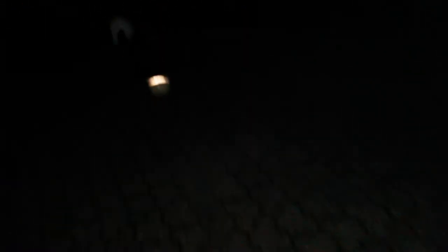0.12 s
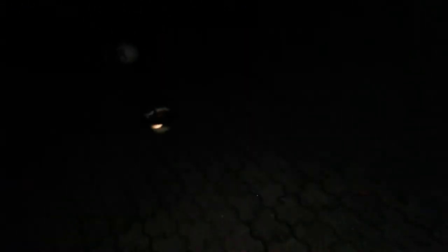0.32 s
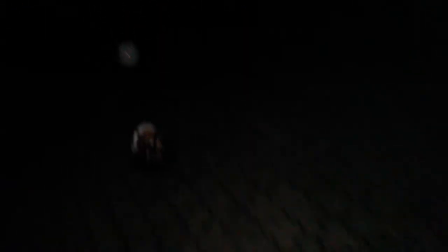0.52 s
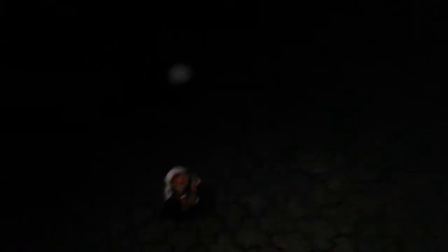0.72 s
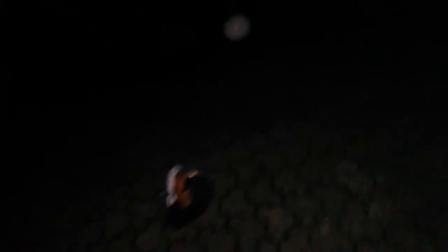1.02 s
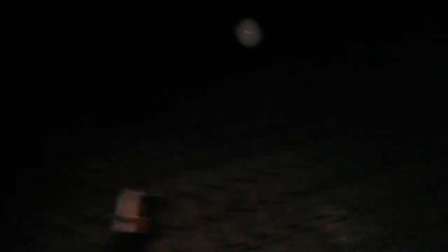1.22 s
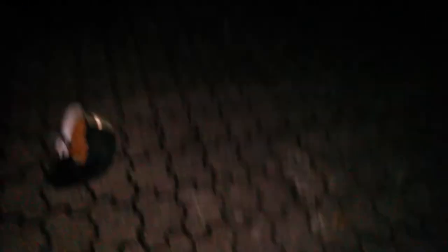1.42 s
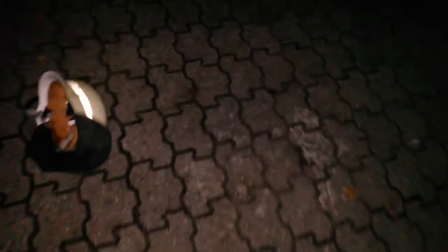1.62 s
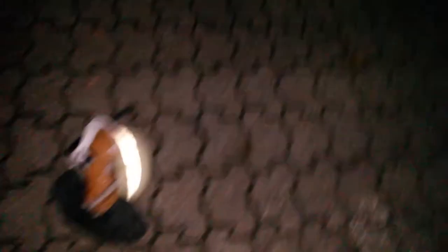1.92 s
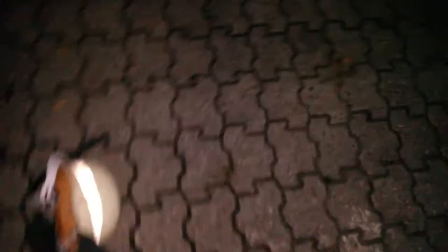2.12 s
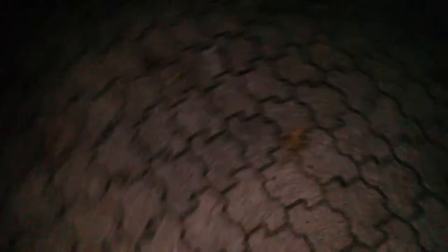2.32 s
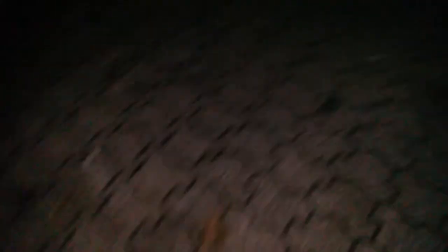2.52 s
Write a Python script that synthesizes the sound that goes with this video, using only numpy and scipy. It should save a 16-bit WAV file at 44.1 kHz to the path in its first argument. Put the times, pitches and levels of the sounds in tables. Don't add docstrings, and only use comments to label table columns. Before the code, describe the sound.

A hard helmet clatters on stone paving: light ticks from 0.1 s, a bounce at 0.24, the loudest woody crack at 0.31, a hollow landing at 0.4, then a sandy skid and short buckle rattle near 0.6. Sparser taps lead to sharp raps at 1.06 and 1.23. From 1.5 s shoes scuff grit, busiest at 2.0-2.5, with handling rumble and cloth hiss growing; walls answer faintly.

```python
import sys
import numpy as np
from scipy import signal
from scipy.fft import rfft, irfft, next_fast_len
from scipy.io import wavfile
from scipy.ndimage import uniform_filter1d, map_coordinates

SR = 44100
rng = np.random.default_rng(int(sys.argv[2]) if len(sys.argv) > 2 else 0)


def invert_db(level):
    return 10 ** (np.asarray(level, dtype=float) / 20)


def persist_wave(psi):
    counts = np.round(np.clip(psi, -1, 1) * 32767).astype(np.int16)
    wavfile.write(sys.argv[1], SR, np.atleast_2d(counts).T)


N = 116865


def unit(x):
    return x / np.sqrt(np.mean(x ** 2) + 1e-20)


def along(points, hz):
    f, v = np.transpose(points)
    return np.interp(np.log(hz + 1), np.log(f + 1), v)


def wobble(rate):
    knots = rng.standard_normal(int(N * rate / SR) + 4)
    return map_coordinates(knots, [np.arange(N) * rate / SR])


def filtered(x, response):
    m = next_fast_len(N + SR // 2)
    return irfft(rfft(x, m) * response(np.fft.rfftfreq(m, 1 / SR)), m)[..., :N]


def noise(spectrum, patchy_db=0):
    z = signal.stft(rng.standard_normal((3, N)), nperseg=256)[2]
    field = uniform_filter1d(rng.standard_normal(z.shape[1:]), size=4, axis=0)
    field = uniform_filter1d(field, size=10, axis=1)
    patchy = signal.istft(z * invert_db(patchy_db * unit(field)), nperseg=256)[1][:, :N]
    x = filtered(patchy, lambda hz: invert_db(along(spectrum, hz)))
    return x / np.std(x)


def swell(s, rise, t60, length=.12):
    t = np.arange(int(length * SR)) / SR
    return round(s * SR), (1 - np.exp(-(t / rise) ** 2)) * invert_db(-60 * t / np.clip(t60, .004, .3))


def slide(s, rise, fall):
    t = np.arange(N) / SR
    return np.exp(-np.where(t < s, ((s - t) / rise) ** 2, 2 * (t - s) / fall))


def add(track, start, piece):
    track[start:start + len(piece)] += piece[:N - start]


# start_s [s], rumble_level_db [dB], hiss_level_db [dB]
WALK = [
    (0, -67.5, -56.5),
    (.3, -64.5, -55),
    (1.15, -61.5, -59.5),
    (1.42, -59, -56),
    (1.7, -55.5, -52.5),
    (2.65, -52, -52.5),
]
# freq_hz [Hz], level_db [dB]
RUMBLE = [(90, -6), (150, -3), (280, 0.5), (400, -8), (1200, -23.5), (2500, -77)]
# freq_hz [Hz], level_db [dB]
HISS = [(300, -70), (500, 2), (3500, 0.5), (8500, -5), (11000, 6), (13000, -5.5), (15300, -7), (15700, -48)]
# freq_hz [Hz], level_db [dB]
WIND = [(20, -22.5), (65, 1), (130, -7), (300, -47)]


def walk():
    s, rumble_db, hiss_db = np.transpose(WALK)
    t = np.arange(N) / SR
    rumble_db = np.interp(t, s, rumble_db)
    hiss_db = np.interp(t, s, hiss_db)
    lumps_db = 3 * wobble(50) + wobble(6)
    ticks_db = wobble(20) + 8 * np.clip(wobble(400) - 1.3, 0, None)
    rumble = invert_db(rumble_db + 4.5 + lumps_db) * noise(RUMBLE)
    hiss = invert_db(hiss_db + 1.0 + ticks_db) * noise(HISS, patchy_db=2.0)
    wind_db = -55 + 0.7 * (rumble_db + 52.0)
    return rumble + hiss + invert_db(wind_db) * noise(WIND)


# freq_hz [Hz], t60_s [s]
YARD = [(200, 0.62), (3000, 0.45), (10000, 0.23)]


def yard(x):
    hz, t, z = signal.stft(rng.standard_normal((2, SR // 3)), SR, nperseg=256)
    decay = invert_db(-60 * t / along(YARD, hz)[:, None])
    tail = signal.istft(z * decay, SR, nperseg=256)[1]
    late = np.pad(x, (200, 0))[None]
    return signal.fftconvolve(late, tail / np.linalg.norm(tail[0]), axes=1)[:, :N]


# peak_s [s], rise_s [s], fall_s [s], level_db [dB]
SKIMS = [
    (.556, 0.0041, .02, -38),
    (.571, .003, .012, -26),
    (0.581, 0.0048, 0.023, -34),
    (1.002, 0.0065, 0.051, -37.5),
]
# freq_hz [Hz], level_db [dB]
SAND = [(6000, -40), (8500, -11), (11000, 3), (14000, -4.5), (15500, -10), (16000, -44)]


def skims():
    level = sum(invert_db(db) * slide(s, rise, fall) for s, rise, fall, db in SKIMS)
    return level * unit(invert_db(4 * wobble(700))) * noise(SAND)


# peak_s [s], rise_s [s], fall_s [s], treble_db [dB], body_db [dB]
DRAGS = [(0.243, 0.0047, 0.052, -41, -32), (0.338, 0.004, 0.14, -55, -36), (0.57, 0.024, 0.016, -52, -65),
         (0.636, 0.0036, 0.18, -44.5, -49), (0.994, 0.0021, 0.01, -38, -42.5),
         (1.238, 0.026, 0.11, -47, -47.5), (1.527, 0.0061, 0.023, -53, -39.5),
         (1.764, 0.0082, 0.17, -55, -47.5), (2.041, 0.028, 0.036, -46, -43),
         (2.184, 0.011, 0.037, -44, -30), (2.279, 0.014, 0.095, -41.5, -42.5),
         (2.64, 0.0085, 0.1, -40, -42)]
# freq_hz [Hz], level_db [dB]
STONE = [(2000, -61), (3500, -4.5), (8500, -6), (11000, 3), (13000, -25), (15300, -30), (15800, -35)]
# freq_hz [Hz], level_db [dB]
SHELL = [(150, -6.5), (400, -1), (1600, -4), (5000, -14.5)]


def grain(rate, deep_db):
    lifts = np.clip(wobble(250) - .4, 0, 1.6)
    return unit(invert_db(deep_db * lifts + 3 * wobble(rate)))


def drags():
    shapes = np.array([slide(s, rise, fall) for s, rise, fall, *_ in DRAGS])
    grit, body = invert_db(np.array(DRAGS)[:, 3:]).T @ shapes
    return grit * grain(900, 8) * noise(STONE) + body * grain(400, 4) * noise(SHELL)


# start_s [s], level_db [dB], width_s [s]
POPS = [
    (.399, -14.5, 0.00024),
    (1.0645, -4.5, 0.000052),
    (2.315, -19.5, 0.000073),
    (2.3286, -10.5, 0.00037),
]
# start_s [s], level_db [dB], width_s [s]
MORE_POPS = [(0.238, -26, 0.00018), (.247, -28, 0.00023), (.256, -33, .0002), (.289, -37, .0002),
             (1.308, -36, .0003), (1.338, -40, .00007), (2.189, -33, 0.000089), (0.391, -39, 0.00028),
             (0.575, -34, 0.00019), (.659, -36, 0.00011), (.694, -29, 0.00014), (.743, -21, 0.00017),
             (0.822, -25.5, 0.00017), (1.049, -45, 0.00025), (1.07, -18.5, 0.00038), (1.097, -30.5, 0.00061),
             (1.1786, -48, 0.000091), (1.253, -41, 0.00007), (1.432, -28, 0.00011), (1.523, -9.5, 0.00005),
             (1.641, -30, 0.0004), (1.657, -31, 0.00014), (1.775, -41, .00017), (1.791, -26, .0001),
             (1.802, -22, .0004), (1.853, -50, .00015), (1.886, -47, 0.000075), (1.999, -32, 0.0002),
             (2.045, -22, 0.00013), (2.138, -26.5, 0.00016), (2.206, -30, 0.00018), (2.422, -32, 0.00022),
             (2.47, -20.5, .00008)]


def pops():
    t = np.arange(N) / SR
    out = np.zeros(N)
    for s, db, width in POPS + MORE_POPS:
        u = np.clip(t - s, 0, None) / width
        out -= invert_db(db) * u * (2 - u) * np.exp(-u)
    return out


def struck(rows, partials, rise, gain_db):
    out, chance = np.zeros(N), rng.standard_normal((len(rows), 8))
    scatter_db = 2 * chance[:, :4]
    detune = 1 + .04 * chance[:, 4:] * (np.arange(4) > 0)
    for (s, db, hz, t60), level_db, off in zip(rows, scatter_db, detune):
        start, shape = swell(s, rise, t60)
        t = np.arange(len(shape)) / SR
        tone = sum(invert_db(level + level_db[k]) * np.sin(2 * np.pi * hz * ratio * off[k] * t)
                   for k, (ratio, level) in enumerate(partials))
        add(out, start, invert_db(db + gain_db) * shape * tone)
    return out


# start_s [s], level_db [dB], pitch_hz [Hz]
THUDS = [(0.237, -32, 142), (0.366, -16.5, 524), (0.4, -28, 278), (0.498, -39.5, 173), (0.69, -35, 294),
         (0.74, -38, 240), (1.072, -36.5, 198), (1.536, -36, 337), (0.991, -40.5, 148), (1.062, -27.5, 480),
         (1.225, -37, 265), (1.527, -32.5, 305), (1.779, -38.5, 153), (1.923, -31, 263),
         (2.172, -33.5, 347), (2.249, -32, 245), (2.314, -28, 237), (2.326, -28.5, 170), (2.34, -38, 280),
         (2.493, -43, 231), (2.541, -36.5, 265), (2.585, -32.5, 267)]


def thuds():
    rows = [(s + 0.0021, db, hz, 12.1 / hz) for s, db, hz in THUDS]
    return struck(rows, [(1.014, 0.5), (1.7, -8.5)], rise=0.00074, gain_db=2.0)


# start_s [s], level_db [dB], pitch_hz [Hz]
KNOCKS = [(0.092, -34.5, 1430), (0.311, -8.5, 1654), (0.338, -29, 1620), (0.4, -29.5, 925),
          (1.064, -31.5, 930), (1.196, -34.5, 2020), (1.2273, -25.5, 2620), (0.422, -29.5, 1580),
          (1.12, -33, 2400), (1.926, -27, 1230), (2.0, -34.5, 1110), (2.037, -32, 1340),
          (2.114, -35.5, 1750), (2.172, -26, 1350), (2.182, -27.5, 1120), (2.225, -27, 1400),
          (2.27, -24, 1450), (2.277, -26, 1420), (2.446, -37, 2270)]


def knocks():
    rows = [(s, db, hz, 19.3 / hz) for s, db, hz in KNOCKS]
    return struck(rows, [(1.015, 1.5), (1.335, -9.5)], rise=0.00045, gain_db=2.0)


# pitch_hz [Hz], level_db [dB], t60_s [s]
BUCKLE = [(1470, -2, .09), (2681, 1.5, .1), (5243, -1, .035)]


def buckle():
    ring_s, ring_db = .606, -28
    rows = [(ring_s, ring_db + db, hz, t60) for hz, db, t60 in BUCKLE]
    return struck(rows, [(1, 0)], rise=.0006, gain_db=0) * invert_db(1.5 * wobble(151))


def shells():
    return filtered(knocks() + thuds() + buckle(), lambda hz: (1j * hz / (90 + 1j * hz)) ** 2)


# start_s [s], treble_peak_db [dB], upper_mid_db [dB], t60_s [s]
CLATTER = [(0.0919, -29.5, -40.5, 0.011), (0.1776, -27.5, -63, 0.016), (0.2372, -10, -36.5, 0.02),
           (0.2808, -24.5, -42, 0.019), (0.3109, -3, -19.5, 0.022), (0.3348, -14, -28, 0.025),
           (0.3985, -20.5, -21.5, 0.016), (0.501, -12.5, -28.5, 0.019), (0.5272, -25.5, -42, 0.03),
           (0.571, -22.5, -63, 0.042), (0.5803, -21.5, -58, 0.021), (0.605, -6, -32.5, 0.024),
           (0.63, -20, -45, 0.051), (0.6895, -21.5, -41.5, 0.019), (0.7794, -26, -72, 0.018),
           (0.827, -27, -48.5, 0.02), (0.912, -23, -68, 0.023), (0.996, -21.5, -68, 0.06),
           (1.0646, -30, -37, 0.027), (1.121, -25.5, -48.5, 0.015), (1.1986, -18.5, -36.5, 0.015),
           (1.2277, -6, -22.5, 0.013), (1.3403, -23, -71, 0.0087)]
# start_s [s], treble_peak_db [dB], upper_mid_db [dB], t60_s [s]
SCUFFS = [(1.5215, -15, -44, 0.0079), (1.5293, -14, -65, 0.011), (1.5926, -26.5, -44, 0.015),
          (1.6855, -27, -50, 0.023), (1.6952, -17.5, -42, 0.019), (1.7197, -27, -43.5, 0.034),
          (1.745, -24.5, -40, 0.02), (1.7621, -15, -36.5, 0.025), (1.8337, -27, -58, 0.016),
          (2.0212, -13.5, -32, 0.014), (2.0378, -10, -32, 0.018), (2.181, -24.5, -36.5, 0.04),
          (2.2254, -9, -32.5, 0.023), (2.2696, -21, -36.5, 0.021), (2.3152, -20.5, -26.5, 0.019),
          (2.3803, -8, -29.5, 0.017), (2.4017, -24, -39, 0.05), (2.5052, -22.5, -48.5, 0.045),
          (2.6334, -33, -44, 0.021)]
# start_s [s], treble_peak_db [dB], upper_mid_db [dB]
TICKS = [(.346, -19, -33), (0.368, -24, -28), (.4253, -32, -33), (.7157, -43, -56), (0.8514, -32, -46.5),
         (0.9582, -34, -55), (0.9823, -29, -69), (1.1792, -58, -54), (1.2536, -27, -48), (1.293, -29, -60),
         (1.5101, -31, -52), (1.7095, -50, -51), (1.7162, -27, -46), (1.7348, -34, -43), (1.749, -24, -48),
         (1.769, -24, -42), (1.788, -40, -44), (1.865, -38, -53.5), (1.9292, -26, -48),
         (1.9813, -27.5, -53), (2.092, -29.5, -49), (2.175, -26, -50), (2.374, -25, -45),
         (2.4676, -33, -48), (2.6153, -30.5, -48)]
# freq_hz [Hz], level_db [dB]
TREBLE = [(4000, -12.5), (6500, -5), (9000, -4), (11000, 5.5), (13000, -7.5), (16500, -26.5)]
# freq_hz [Hz], level_db [dB]
UPPER = [(1800, -47), (2800, 2.5), (4500, 10), (6500, -1), (9000, -23)]


def cracks():
    tick_t60_s, rise_share = 0.018, 0.083
    treble_gain_db, upper_gain_db = -3 - 3, 8.5 - 1.5
    high, upper = np.zeros(N), np.zeros(N)
    for s, db, upper_db, t60 in CLATTER + SCUFFS + [(*tick, tick_t60_s) for tick in TICKS]:
        start, shape = swell(s - .0008, rise_share * t60, t60)
        shape = shape * (1 + 0.52 * (shape / shape.max()) ** 10)
        add(high, start, invert_db(db + treble_gain_db) * shape)
        add(upper, start, invert_db(upper_db + upper_gain_db) * shape)
    spikes = invert_db(2.5 * wobble(1200))
    return spikes * (high * noise(TREBLE) + upper * noise(UPPER, patchy_db=2.5))


# freq_hz [Hz], common_share [0-1]
ALIKE = [(40, 0.42), (150, 1), (1000, 0.63), (4000, 0.17), (12000, 0.6)]


def ports(three, share):
    def common_power(hz):
        return np.clip(share * along(ALIKE, hz), 0, 1)
    common = filtered(three[0], lambda hz: np.sqrt(common_power(hz)))
    return common + filtered(three[1:], lambda hz: np.sqrt(1 - common_power(hz)))


def scene():
    grit, body = cracks(), shells() + pops()
    contacts = ports(grit + drags(), share=0.59) + body
    answer = invert_db(-15) * yard(grit[0] + .5 * body)
    return contacts + answer + ports(walk(), share=0.63) + ports(skims(), share=0.77)


def roll_off(x):
    return signal.sosfilt(signal.butter(12, 16510, fs=SR, output="sos"), x)


# freq_hz [Hz], left_minus_right_db [dB]
PORTS = [(40, 3.5), (200, -3), (600, -7), (1500, -3), (6000, -1.5), (9000, -21.5), (15000, -28.5)]
# start_s [s], length_s [s]
GAPS = [
    (.229, .006),
    (.295, .013),
    (1.213, .004),
]


def record(dry):
    lag_s, top_hz = 0.00011, 16300

    def response(hz):
        right = 2 / (1 + invert_db(along(PORTS, hz)))
        return np.array([(2 - right) * np.exp(-2j * np.pi * hz * lag_s), right])
    clipped = np.clip(filtered(dry, response), -.9, .9)
    wet = filtered(clipped, lambda hz: hz < top_hz)
    t = np.arange(N) / SR
    muted = sum(1. * (t > s) * (t < s + length) for s, length in GAPS)
    muted = uniform_filter1d(muted, size=40)
    return roll_off(wet - muted * filtered(wet, lambda hz: hz > 2000))


dry = scene()
out = record(dry)
persist_wave(out)
```